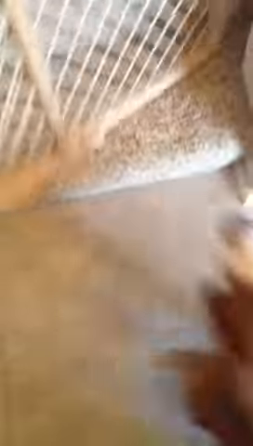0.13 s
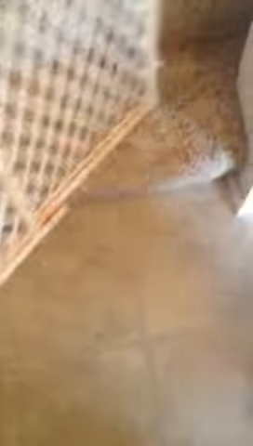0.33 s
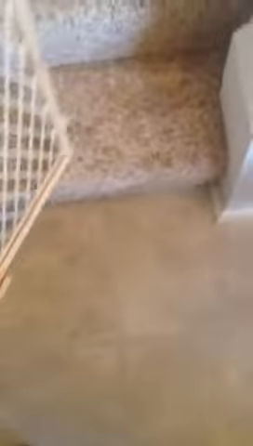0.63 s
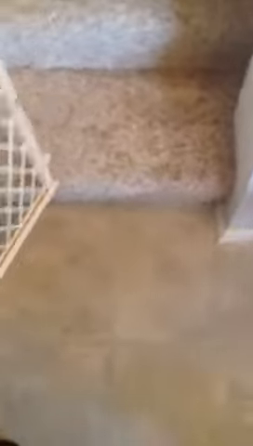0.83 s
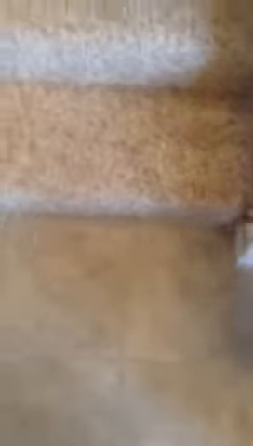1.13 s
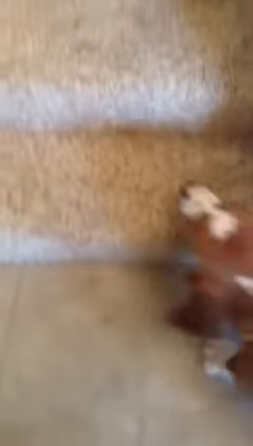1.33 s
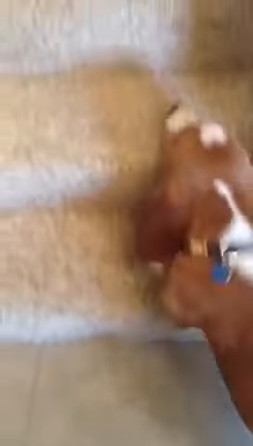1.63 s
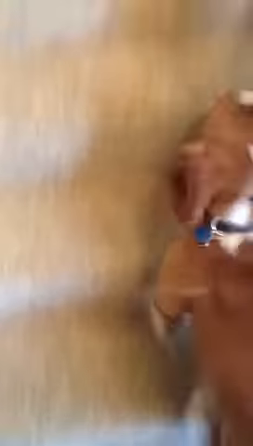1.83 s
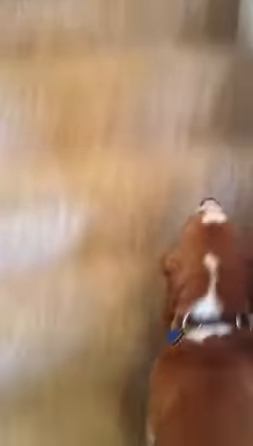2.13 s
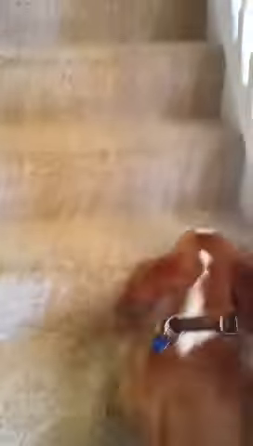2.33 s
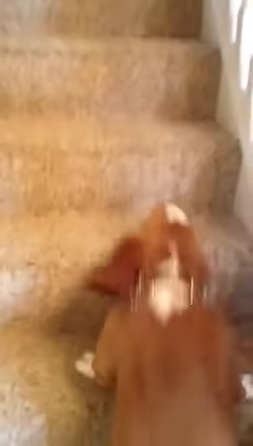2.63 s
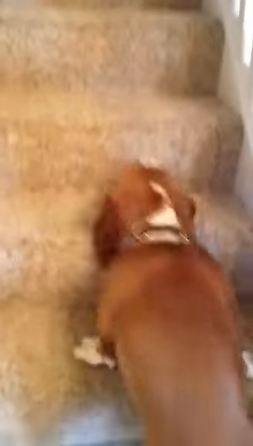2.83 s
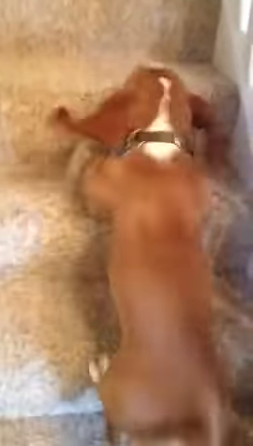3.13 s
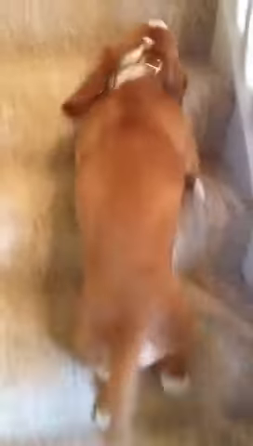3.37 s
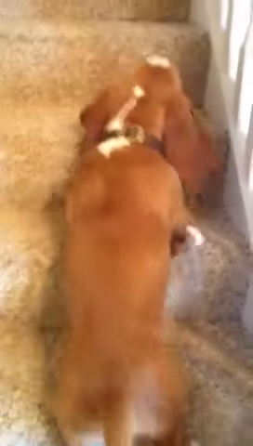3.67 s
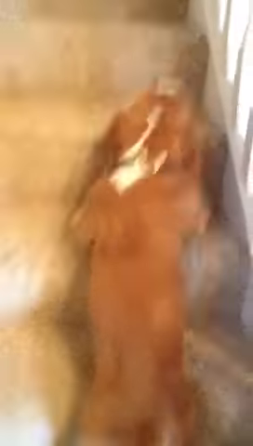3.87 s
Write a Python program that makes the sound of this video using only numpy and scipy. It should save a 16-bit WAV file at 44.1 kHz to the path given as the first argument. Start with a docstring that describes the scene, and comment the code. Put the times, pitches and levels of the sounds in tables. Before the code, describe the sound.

A dog's paws thump and scrabble up carpeted stairs while its collar tag jingles.

```python
"""A small hard hallway, heard through a nearby phone. A dog scrabbles over a tiled floor while a wooden
lattice gate is dragged aside, then climbs carpeted stairs. Claws and gate click by hard impact, padded
paws thump and excite the resonances of the boards, and gate, fur and paws rub by friction.
The metal tag on the dog's collar clinks and rings in its own modes of vibration."""
import sys
import numpy as np
from scipy import signal
from scipy.fft import rfft, irfft
from scipy.io import wavfile
from scipy.ndimage import uniform_filter1d

SR = 44100
rng = np.random.default_rng(int(sys.argv[2]) if len(sys.argv) > 2 else 0)


def generate_wav(signal):
    """Clip the signal to [-1, 1] and save it as 16-bit WAV at the path in sys.argv[1]."""
    frames = np.transpose(np.atleast_2d(signal))
    scaled = np.clip(frames, -1, 1) * 32767
    pcm = np.round(scaled).astype(np.int16)
    wavfile.write(sys.argv[1], SR, pcm)


N = 176400
BANDS_HZ = [(1720, 6060), (429, 2360), (4720, 9500)]  # bite, body and fizz of clicks and rubbing


def amp(db):
    return 10 ** (np.asarray(db) / 20)


def unit_rms(x):
    return x / np.sqrt(np.mean(x ** 2) + 1e-20)


def unit_peak(x):
    return x / abs(x).max()


def log_interp(points, hz):
    point_hz, values = np.transpose(points)
    return np.interp(np.log(hz + 1), np.log(point_hz + 1), values)


def add(mix, start_s, sound):
    part = mix[max(round(start_s * SR), 0):][:len(sound)]
    part += sound[:len(part)]


def bandpass(x, edges_hz):
    return signal.sosfilt(signal.butter(2, np.clip(edges_hz, 30, 20000), "bandpass", fs=SR, output="sos"), x)


# Claw clicks, gate clatter and scuffs: start_s, bite_db, body_relative_db, fizz_relative_db, scrape_s
HARD_CONTACTS = [(0.0024, -20, -10.5, -39, 0.0063), (0.026, -23.5, -10.5, -7, 0.0085),
                 (0.0922, -32.5, 3.5, -5, 0.012), (0.3004, -26.5, -17, -8.5, 0.023),
                 (0.3646, -22, -11.5, 0.5, 0.012), (0.566, -32.5, -7, -21, 0.026),
                 (0.582, -22.5, -11, -6, 0.017), (0.6048, -14.5, -11.5, -17, 0.032),
                 (0.6082, -9.5, -13, -2.5, 0.004), (0.7815, -34.5, -16, -29, 0.019),
                 (0.8953, -25.5, -2, -23, 0.012), (1.1601, -22, 0, -13, 0.024),
                 (1.204, -21.5, -20, -2, 0.0042), (1.354, -25.5, -11.5, -8, 0.028),
                 (1.4667, -24, -8.5, -30, 0.02), (1.53, -24.5, 2.5, -22, 0.0085),
                 (1.5686, -22.5, -2.5, -8.5, 0.013), (1.73, -30, -7.5, -5.5, 0.035),
                 (2.088, -33.5, 3, -6, 0.0088), (2.1818, -33.5, 3, -8, 0.0092),
                 (2.292, -27.5, -3, -13, 0.008), (2.3575, -35, -0.5, -25, 0.01),
                 (3.192, -24.5, 0.5, 4, 0.0042), (3.379, -34, -2.5, -24, 0.0045),
                 (3.452, -28.5, -12, -7, 0.0029), (3.592, -43, 4.5, -1, 0.019),
                 (3.7032, -43.5, 9.5, -15, 0.0038), (3.979, -37.5, -1.5, -22, 0.027)]


def claw_and_gate_clicks(snap_db=9.5, snap_s=0.00025, grain_db=2.5):
    """Hard impact: a brief contact gives a broadband snap, and sliding adds a short grainy scrape."""
    out, t = np.zeros(N), np.arange(SR // 5) / SR
    for start_s, bite_db, body_db, fizz_db, scrape_s in HARD_CONTACTS:
        noise = rng.standard_normal(t.size)
        grains = amp(grain_db * np.repeat(rng.standard_normal(t.size // 30), 30))
        scrape = noise * grains * np.exp(-(t / scrape_s) ** 2)
        snap = amp(snap_db) * rng.choice([-1, 1], t.size) * np.exp(-t / snap_s)
        for band_db, edges_hz in zip((0, body_db, fizz_db), BANDS_HZ):
            add(out, start_s, amp(bite_db + band_db) * unit_peak(bandpass(scrape + snap, edges_hz)))
    return out


# Paw thumps and hollow knocks: start_s, level_db, pitch_hz
PADDED_BLOWS = [(0.091, -28, 219), (0.2804, -31, 398), (0.351, -29.5, 475), (1.052, -29, 370),
                (1.1618, -15.5, 2080), (1.1622, -13, 1060), (1.172, -26, 193), (1.408, -30, 830),
                (1.48, -24, 444), (1.535, -28.5, 174), (1.561, -24.5, 390), (1.699, -27.5, 290),
                (1.967, -24.5, 289), (1.994, -24.5, 314), (2.006, -34.5, 150), (2.291, -31.5, 330),
                (2.352, -30, 436), (2.468, -30.5, 265), (3.059, -35, 265), (3.208, -24, 328),
                (3.2378, -17.5, 305), (3.272, -31, 330), (3.393, -35, 232), (3.581, -37, 330),
                (3.6989, -34, 320)]
# Floor and stair modes: pitch_hz, t60_s, level_db
BOARD_MODES = [(125, .15, -6), (176, .35, 3)]


def paw_thumps(rise_cycles=0.5, roughness=0.3, boards_db=1):
    """Impact excitation: each padded blow is a heavily damped swing that sets the boards ringing."""
    blows, t = np.zeros(N), np.arange(SR // 2) / SR
    for start_s, level_db, hz in PADDED_BLOWS:
        noise = unit_rms(bandpass(rng.standard_normal(t.size), (hz / 2, hz * 3)))
        swing = np.sin(2 * np.pi * hz * t) + roughness * noise
        envelope = t * np.exp(-t * hz / rise_cycles)
        add(blows, start_s, amp(level_db) * unit_peak(swing * envelope))
    # The divisor brings each mode's gain at resonance to about its listed level.
    boards = sum(amp(db - 60 * t / t60) * np.sin(2 * np.pi * hz * t) / (t60 * SR / 14)
                 for hz, t60, db in BOARD_MODES)
    return blows + amp(boards_db) * signal.fftconvolve(blows, boards)[:N]


# Strikes on the tag: start_s, second_pair_db, other_pairs_relative_db, tick_relative_db
TAG_STRIKES = [(0.1495, -30.5, -23, 1.5), (0.266, -37.5, -27, -1), (0.4203, -29, -18, 8),
               (0.4316, -26, -13, 3), (0.4577, -45, -18, 12), (0.5102, -25.5, -10.5, -1.5),
               (1.688, -25.5, -12.5, -0.5), (1.7372, -38, 8, 11.5), (1.7879, -28.5, -8, 5.5),
               (1.825, -23, -6, -7), (1.8522, -23.5, -7.5, -0.5), (1.9773, -35.5, -0.5, -2),
               (2.0207, -28.5, -7, 3), (2.2586, -41, 5, 9), (2.4248, -22.5, 3, 5), (2.4471, -21.5, -20, 2),
               (2.463, -24.5, -10, 2.5), (2.5729, -21.5, -4.5, -0.5), (2.7762, -36.5, -4.5, 0.5),
               (2.939, -46.5, -8, 11.5), (3.017, -44, 0.5, 12), (3.1396, -23.5, -3, 1),
               (3.1579, -23.5, -0.5, -10), (3.1963, -29, -11, -1.5), (3.296, -51, 6, -5),
               (3.3807, -48.5, 7, 15), (3.483, -37, -4, 12.5), (3.635, -39, -7.5, -11),
               (3.776, -39, 2, -10)]
# Tag modes, in four close pairs: pitch_hz
TAG_MODES = [5700, 5770, 9527, 9600, 13240, 13350, 15150, 15300]


def collar_tag(flutter_db=3.0, rebounds_per_s=45, rebound_db=-9, rebound_t60_s=0.3, tick_s=0.0025):
    """Modal vibration: close pairs of modes beat after each tick; the tag rebounds on its loop."""
    out, t = np.zeros(N), np.arange(SR // 5) / SR
    t60_s = np.repeat([0.035, 0.058, 0.048, 0.057], 2)
    scatters = rng.standard_normal((len(TAG_STRIKES), 2, len(TAG_MODES)))
    noises = rng.standard_normal((len(TAG_STRIKES), t.size))
    for (start_s, level_db, others_db, tick_db), scatter, noise in zip(TAG_STRIKES, scatters, noises):
        modes_db = np.repeat([others_db - 7, 0, others_db, others_db - 18], 2) + 1.62 * scatter[0]
        modes_hz = np.array(TAG_MODES) * (1 + 0.0032 * scatter[1])
        ring = sum(amp(db - 60 * t / t60) * np.sin(2 * np.pi * hz * t) / 2
                   for hz, t60, db in zip(modes_hz, t60_s, modes_db))
        flutter = amp(flutter_db * unit_rms(uniform_filter1d(noise, size=200)))
        rebounds = rng.random(t.size) < rebounds_per_s / SR
        hits = rebounds * noise * amp(rebound_db - 60 * t / rebound_t60_s)
        hits[0] = 1  # the strike itself
        add(out, start_s, amp(level_db) * signal.fftconvolve(flutter * ring, hits))
        tick = bandpass(noise * np.exp(-t / tick_s), edges_hz=(5170, 12900))
        add(out, start_s, amp(level_db + tick_db) * unit_peak(tick))
    return out


# Strokes of gate, fur and paws: start_s, length_s, bite_db, body_relative_db, fizz_relative_db
RUB_STROKES = [(0.935, 0.24, -54.5, 10.5, -2), (1.218, 0.48, -54.5, -2, -4), (1.876, 0.32, -60, 0, 0.5),
               (3.039, 0.32, -70, 12, 5), (3.547, 0.37, -66, -6.5, 4)]


def rubbing(grains_per_s=2700, spread_db=6.5):
    """Friction noise: dense uneven impulses merge into a rasp that swells and fades over each stroke."""
    out, t = np.zeros(N), np.arange(N) / SR
    strength = amp(spread_db * np.minimum(rng.exponential(1, N), 5))
    grains = strength * (rng.random(N) < grains_per_s / SR)
    bands = [unit_rms(bandpass(grains * rng.choice([-1, 1], N), edges)) for edges in BANDS_HZ]
    for start_s, length_s, bite_db, body_db, fizz_db in RUB_STROKES:
        swell = np.sin(np.pi * np.clip((t - start_s) / length_s, 0, 1)) ** .5
        out += swell * sum(amp(bite_db + db) * band for db, band in zip((0, body_db, fizz_db), bands))
    return out


# Decay of the hallway: frequency_hz, t60_s
HALL_DECAY = [(150, 0.6), (1000, 0.24), (4000, 0.3), (14000, 0.18)]


def hallway(x, gap_s=0.0023, rotation_hz=3.5):
    """Reverberation: each band decays exponentially at its own rate, in three tails fed in rotation."""
    hz, t, spectra = signal.stft(rng.standard_normal((3, SR // 2)), SR, nperseg=256)
    decay = amp(-60 * t / log_interp(HALL_DECAY, hz)[:, None])
    tails = signal.istft(spectra * decay, SR, nperseg=256)[1]
    tails *= np.clip(np.arange(tails.shape[1]) / SR / gap_s - 1, 0, 1)
    tails /= np.linalg.norm(tails, axis=1)[:, None]
    angle = 2 * np.pi * rotation_hz * np.arange(N) / SR + np.pi * np.arange(3)[:, None] / 3
    feeds = x * np.sin(angle) * np.sqrt(2 / 3)
    return signal.fftconvolve(feeds, tails, axes=1).sum(0)[:N]


def scene():
    """Superposition: the direct sounds and their reverberation add in one channel."""
    tag, paws = collar_tag(), paw_thumps()
    scrabble = claw_and_gate_clicks() + rubbing()
    reverb = hallway(scrabble + amp(-2) * tag + amp(-3.5) * paws)
    return (tag + paws + scrabble + amp(1.5) * reverb)[None]


# Spectrum of the steady hiss and hum: frequency_hz, relative_density_db
NOISE_FLOOR = [(30, -22), (65, -5), (95, -12.5), (200, 1), (600, -7), (2500, -14), (9000, -18.5),
               (15000, -18)]


def record(dry):
    """Band limiting: a small microphone drops the bass, adds faint noise and cuts the highest treble."""
    low_cut_hz, high_cut_hz, floor_db = 110.5, 15450, -59
    thin = signal.sosfilt(signal.butter(5, low_cut_hz, "highpass", fs=SR, output="sos"), dry)
    colour = amp(log_interp(NOISE_FLOOR, np.fft.rfftfreq(N, 1 / SR)))
    noise = unit_rms(irfft(rfft(rng.standard_normal(N)) * colour, N))
    lowpass = signal.firwin(511, high_cut_hz, window=("kaiser", 9), fs=SR)
    return signal.oaconvolve(thin + amp(floor_db) * noise, lowpass[None], "same")


dry = scene()
out = record(dry)
generate_wav(out)
```